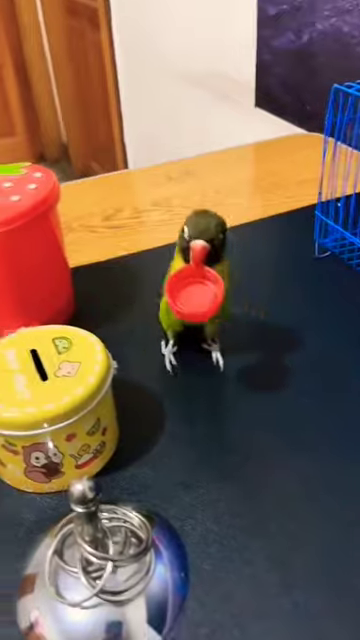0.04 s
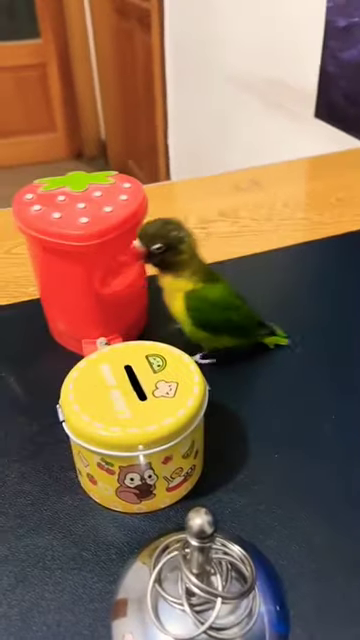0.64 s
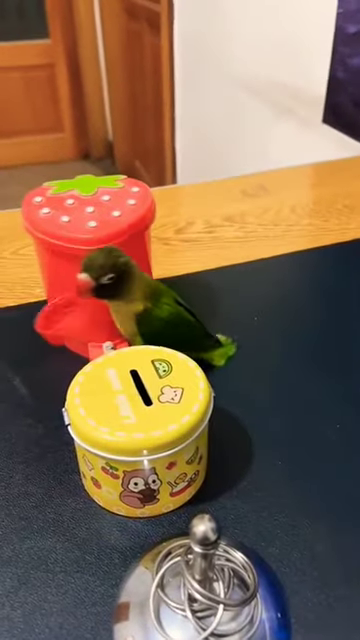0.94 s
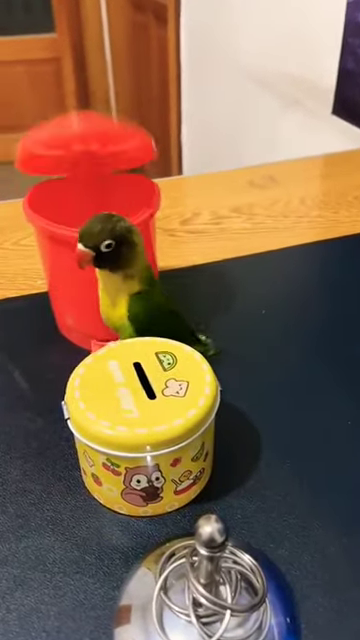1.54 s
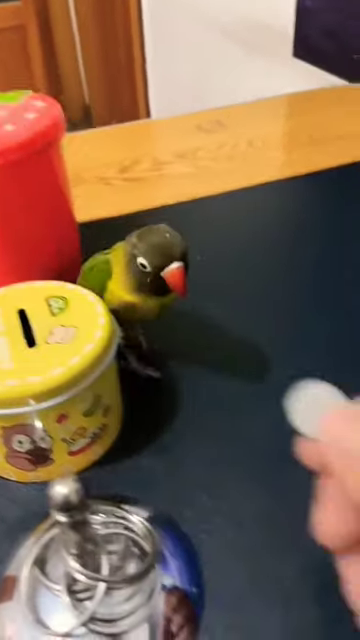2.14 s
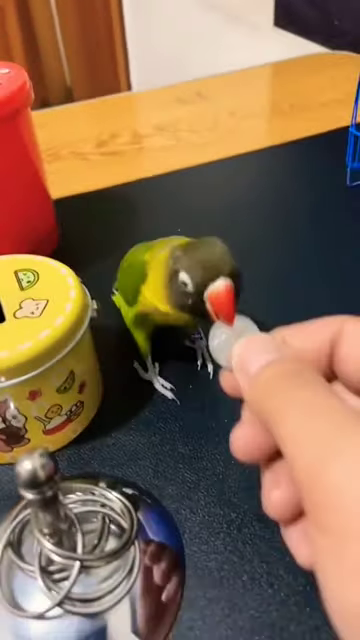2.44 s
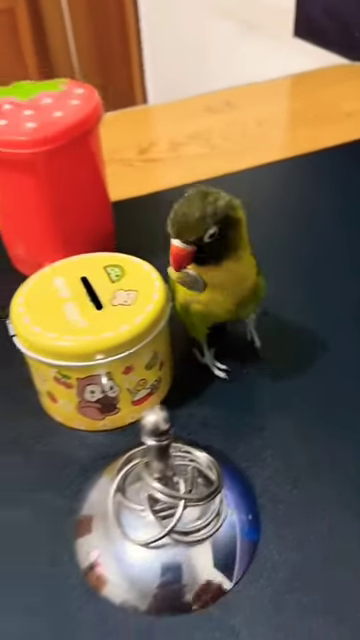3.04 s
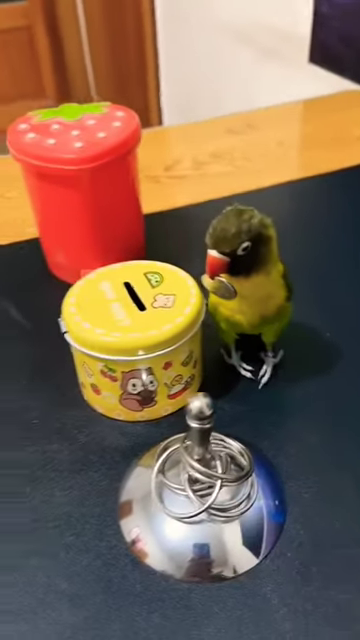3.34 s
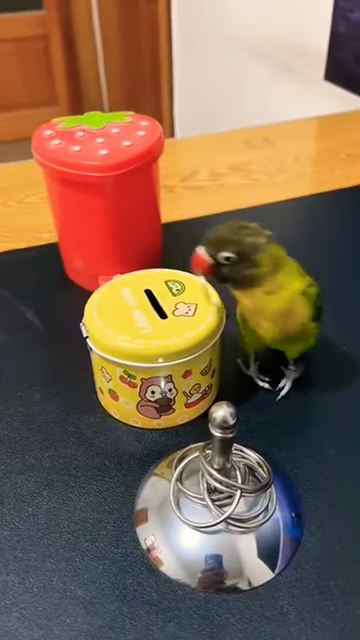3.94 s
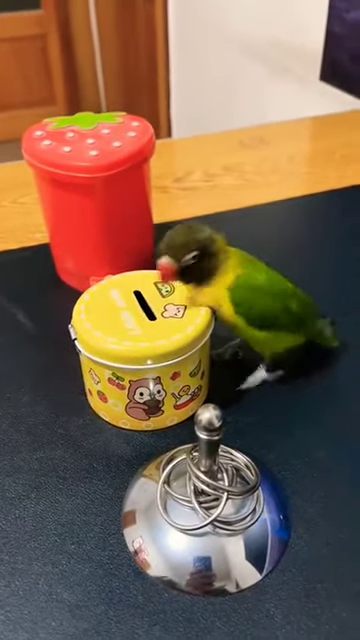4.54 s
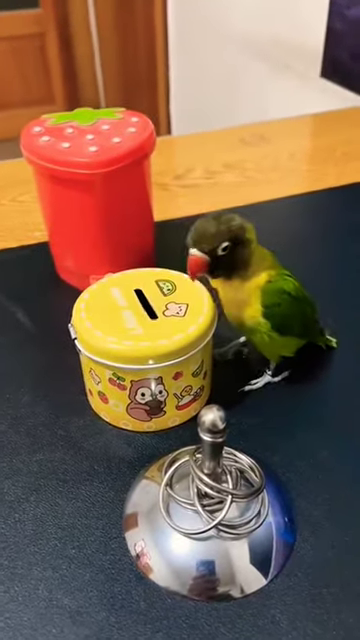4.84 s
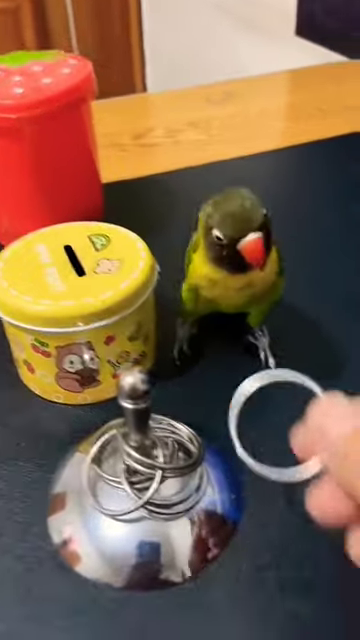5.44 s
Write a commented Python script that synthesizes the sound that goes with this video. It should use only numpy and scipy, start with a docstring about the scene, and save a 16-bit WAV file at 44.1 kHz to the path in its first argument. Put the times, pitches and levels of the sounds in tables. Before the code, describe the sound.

Light claw taps, a clattering plastic lid, one sharp knock, then a coin banging and bouncing in a tin money box indoors.

```python
"""A parrot's table tricks

In a bare, echoing room, a small parrot's claws tick as it carries a cap to a plastic pedal bin, whose
lid opens and clatters. Something hard knocks on the tabletop. The bird bangs a coin on a tin money box
and drops it through the slot, where it bounces. Each hit rings a thing's own tones (its modes) and adds
a brief crack. Rustling feathers and rubbing parts are noise that swells and fades."""
import sys
import numpy as np
from scipy import signal
from scipy.fft import rfft, irfft
from scipy.io import wavfile

SR = 44100
rng = np.random.default_rng(int(sys.argv[2]) if len(sys.argv) > 2 else 0)


def inscribe(sig):
    """Save sig as 16-bit PCM at rate SR to the path in sys.argv[1].

    A 1-D sig is mono; a 2-D sig holds one channel per row.
    Samples are clipped to [-1, 1] before scaling.
    """
    pcm = np.round(np.clip(np.atleast_2d(sig).T, -1, 1) * 32767)
    wavfile.write(sys.argv[1], SR, pcm.astype(np.int16))


N = 250488
TIME = np.arange(N) / SR

# Levels are relative. A fade time (t60) is how long a sound takes to drop by 60 dB.
# hits on the bin, tin and tabletop; weight boosts the lows, edge the highs, focus one narrow band:
# (time [s], level [dB], weight [dB], edge [dB], contact time [s], focus [Hz])
BIN_HITS = [(.8222, -37, -5, -3.5, 0.00024, 2450), (1.3009, -53, 0, -6, 0.00072, 2600),
            (1.3483, -51, 0.5, -4, 0.0039, 2200), (1.4340, -26, -4, -12, 0.00012, 1900),
            (1.4362, -25.5, 8.5, -12, 0.00027, 780), (1.453, -33, 3, -9.5, 0.0018, 800),
            (1.5475, -38, 10, -7.5, .0005, 780), (1.6042, -17, 2.5, -1.5, 0.00089, 2650),
            (1.6704, -18.5, -16, 0.5, .0001, 2400), (1.6745, -15.5, -10, -0.5, 0.00036, 4300),
            (1.6776, -17, -4.5, 0, .0004, 2900), (1.70, -27.5, -4, 3.5, 0.0037, 4800),
            (1.7255, -23.5, -27.5, 0.5, 0.002, 3000), (1.7538, -21, -5, -4.5, 0.00047, 2650),
            (1.789, -27.5, -7.5, -10, 0.00097, 2700), (2.0567, -45, -2.5, -5, 0.0025, 2286)]
COIN_HITS = [(4.2968, -19, 3, -4, 0.0013, 638), (4.3048, -22.5, 5.5, -0.5, 0.00026, 2500),
             (4.310, -33.5, -6.5, 2, 0.00095, 2660), (4.324, -27.5, 8.5, -2, 0.00035, 600),
             (4.6048, -31, 8, -2.5, 0.0005, 613), (4.617, -33.5, 8.5, -6.5, 0.0027, 3020),
             (4.638, -32, -7.5, 13, 0.002, 4150), (4.6412, -20, 3, 0, 0.00064, 1500),
             (4.6435, -23.5, -1.5, 4, 0.00061, 2080), (4.7407, -21, 0, 2, 0.0002, 3300),
             (4.7755, -31, -14.5, 0, 0.00042, 3160), (4.779, -19.5, -8.5, 0, 0.0011, 585),
             (4.793, -31, 6.5, -2, 0.0029, 3730), (4.886, -29, -5, -2, 0.004, 3000),
             (4.9062, -19, -3, 1.5, 0.0024, 573), (4.944, -28, 0.5, 3.5, 0.0033, 2970)]
TABLE_HITS = [(.823, -47, 4, -6, 0.00032, 805.5), (.910, -53.5, 8.5, -6, .0003, 770),
              (1.0807, -39.5, 3.5, -11, 0.0012, 560.6), (1.1034, -45, 6, -10.5, 0.0004, 250),
              (2.3459, -14.5, 5, 0, 0.000074, 2660)]
# light taps of claws and beak: (time [s], level [dB], edge [dB], contact time [s])
CLAW_TAPS = [(.051, -49, -4, 0.00091), (0.0774, -45.5, 7.5, 0.0011), (.139, -56, 9, .001),
             (.211, -50.5, 7, 0.00034), (.310, -53, -0.5, .0005), (.474, -50.5, 13, .0008),
             (.481, -46.5, 4, .0006), (.53, -48, 3, 0.0077), (.615, -48.5, -1, 0.003),
             (.693, -59.5, 7, .002), (.775, -53.5, 7, 0.0094), (.8016, -50.5, 8.5, .0004),
             (0.9415, -41.5, -1, 0.00092), (1.1857, -48, 4, .0016), (2.1725, -40.5, 5.5, 0.00027),
             (2.636, -43, 4, .001), (2.799, -52.5, 8, .001), (2.823, -53, 5, .0006),
             (2.854, -47.5, 2.5, 0.0011), (2.862, -45, -1.5, .002), (2.892, -50.5, 0, .002),
             (2.9227, -51, -7, .0006), (3.112, -43, -22, 0.014), (3.191, -52, 1, 0.0019),
             (3.237, -53.5, -10, 0.00078), (3.4313, -56.5, 0, .0004), (3.499, -56, 1.5, .0003),
             (4.187, -56.5, 4, 0.0019), (4.2268, -51, 1, 0.0021), (4.262, -49, 5, 0.0038),
             (4.288, -33.5, -6, 0.0048), (5.32, -40, -10.5, 0.0067), (5.458, -48.5, -3.5, .002),
             (5.4987, -51.5, 10, 0.0022)]
# dull thumps through the table as the bird steps back: (time [s], level [dB])
STEPS = [(4.645, -34.5), (4.749, -26.5), (4.793, -37), (4.907, -34), (4.955, -33), (5.262, -43.5)]

# the tones each thing rings with: (pitch [Hz], energy [dB], fade time [s])
BIN_MODES = [(314, -31.5, .12), (758, -7, 0.06), (846, -10, 0.045), (1357, -13.5, 0.031),
             (2000, -18.5, 0.022), (2300, -9, 0.02), (2673, -9.5, 0.046), (3190, -14, 0.019),
             (4025, -11.5, 0.0071), (4500, -24.5, .02), (5480, -20, 0.036)]
TIN_MODES = [(311, -29, .2), (567, -7.5, 0.033), (676, -11.5, 0.033), (781, -8, 0.071), (929, -12.5, 0.02),
             (1507, -15.5, 0.029), (1624, -18.5, 0.11), (2145, -9.5, 0.031), (2526, -12.5, 0.038),
             (3040, -14.5, 0.045), (3280, -12, 0.16), (4230, -18.5, 0.071), (5180, -24, 0.066),
             (5490, -21.5, 0.076), (9260, -33, 0.069), (9280, -33.5, 0.037)]
TABLE_MODES = [(206, -21, 0.042), (360, -8, 0.027), (502.5, -20, 0.023), (780, -12.5, 0.0075),
               (965, -14, 0.032), (1360, -12.5, 0.0027), (2560, -5.5, 0.0078), (3430, -15, 0.016),
               (4020, -17, 0.011)]
THUMP_MODES = [(83.5, -7, 0.26), (111.2, -7, 0.43), (150, -11.5, 0.054)]  # the whole table under a step
ROOM_BOOM_MODES = [(172.6, -18, 1.3), (242, -7, 0.13), (280, -13, 0.2087), (327, -6.5, 0.71),
                   (387.4, -2, 0.46), (368, -11, 1.2), (488, -15.5, 0.98), (790, -14, 0.9)]  # the room's low resonances, booming on after a knock
CLAW_MODES = [(2470, -15.5, .012), (3600, -17, 0.0064), (5130, -17, .008)]
# each thing's crack, a crowd of short-lived modes: (frequency [Hz], level [dB])
BIN_CRACK = [(150, -23.5), (500, -15), (900, -2), (1700, -5), (2600, -0.5), (4500, -7.5), (5700, -10),
             (6800, -21), (9000, -25), (11500, -47), (15000, -41.5)]
TIN_CRACK = [(40, -33), (200, -12), (350, -17.5), (700, 2), (1150, -6), (1600, -1), (3000, 1.5), (4500, -5),
             (7000, -14.5), (9200, -12.5), (11500, -26.5), (14000, -15.5), (16000, -31.5)]
TABLE_CRACK = [(35, -19), (100, -10.5), (200, 2.5), (330, 0), (450, 1.5), (600, -0.5), (900, 1), (1300, -1),
               (1900, -0.5), (2700, 0), (4200, -6), (6500, -13.5), (9500, -18.5), (11500, -27),
               (15000, -22)]
CLAW_CRACK = [(60, -22), (200, -11), (700, -7.5), (1500, -5.5), (2600, 4.5), (5000, -5), (7000, -8.5),
              (9000, -10), (11500, -23.5), (15000, -17.5)]  # also shapes the feather noise

# rubbing movements: (start [s], length [s], level [dB])
PEDAL_PUSHES = [(1.348, .014, -51), (1.42, 0.094, -44), (1.575, .03, -44.5), (1.875, 0.022, -41.5),
                (2.045, 0.025, -45.5), (2.21, 0.015, -47), (2.324, 0.014, -45)]
FEATHER_RUSTLES = [(0, 0.092, -58), (.93, 0.088, -61.5), (1.18, 0.57, -64.5), (2.08, 0.16, -64.5),
                   (2.77, .1, -61), (3.04, 0.16, -65.5), (4.17, 0.11, -64.5), (5.28, .22, -68)]
BEAK_SLIDES = [(1.2, 0.047, -71), (3.01, 0.12, -62.5), (3.195, 0.033, -70)]
# the tone colour of each noise: (frequency [Hz], level [dB])
BIN_HOLLOW_COLOUR = [(60, -25.5), (160, -16), (330, -17), (520, -20.5), (680, -6.5), (780, -2), (880, -8.5),
                     (1100, -25), (2400, -23.5), (5000, -48), (12000, -80.5)]
SLIDE_COLOUR = [(1000, -20.5), (5000, -7), (11000, -9.5), (13500, 2), (16000, -5)]
ECHO_COLOUR = [(80, -8.5), (220, 6), (350, 4.5), (500, -4.5), (900, -3.5), (1500, -1.5), (2600, -9),
               (5000, -5), (9000, -5.5), (14000, -3.5)]
STILL_ROOM_COLOUR = [(15, -57.5), (25, -25.5), (43, -8), (102, -9), (134, -15.5), (249, -18.5), (285, -22),
                     (439, -23.5), (734, -26.5), (1040, -28), (1480, -31), (1610, -27.5), (12200, -46),
                     (16000, -45.5)]
# how long the room echoes: (frequency [Hz], fade time [s])
ECHO_FADES = [(100, 0.47), (350, 0.79), (1000, 0.86), (2500, 0.86), (5000, 0.85), (9000, 0.68),
              (15000, 0.33)]


def pedal_bin():
    """The plastic bin and lid clatter; pushing the pedal rubs its linkage, sounding the bin's hollow."""
    clatter = struck(BIN_HITS, BIN_MODES, BIN_CRACK, crack_db=-1.5, crack_t60=0.015, vary_db=1)
    rubbing = strokes(PEDAL_PUSHES, attack_s=0.01, t60=0.081) * noise(BIN_HOLLOW_COLOUR)
    return clatter + from_db(-5.5) * rubbing


def coin_on_tin():
    """The tin box rings as the coin bangs on it, then bounces inside."""
    return struck(COIN_HITS, TIN_MODES, TIN_CRACK, crack_db=0.5, crack_t60=0.042, vary_db=2)


def table_knocks():
    """Something hard hits the tabletop, which rings briefly."""
    return struck(TABLE_HITS, TABLE_MODES, TABLE_CRACK, crack_db=0, crack_t60=0.019, vary_db=2)


def thumps_and_booms():
    """Steps thump the table; hard knocks set the room booming."""
    out = np.zeros(N)
    for start_s, db in STEPS:
        thump = ringing(THUMP_MODES, TIME[:SR // 2], rise_s=0.006, vary_db=2)
        add(out, start_s, from_db(db) * thump)
    for start_s, db, weight_db, *_ in TABLE_HITS:
        boom = ringing(ROOM_BOOM_MODES, TIME[:2 * SR], rise_s=0.0058, vary_db=2)
        add(out, start_s, from_db(db + weight_db / 2 - 1.5) * boom)
    return out


def claw_ticks(weight_db=3, focus_hz=4500):
    """Claws and beak touch lightly, making small, bright ticks."""
    hits = [(start_s, db, weight_db, edge_db, contact_s, focus_hz)
            for start_s, db, edge_db, contact_s in CLAW_TAPS]
    return from_db(-4.5) * struck(hits, CLAW_MODES, CLAW_CRACK, crack_db=0, crack_t60=0.018, vary_db=0)


def rustles():
    """Feathers brush unevenly as the bird moves; the cap or coin hisses as it slides in the beak."""
    flicker_db = 1.5 * noise([(20, 3.5), (120, 0), (500, -52)])
    feathers = strokes(FEATHER_RUSTLES, attack_s=0.024, t60=0.9) * noise(CLAW_CRACK)
    slides = strokes(BEAK_SLIDES, attack_s=0.03, t60=0.2) * noise(SLIDE_COLOUR)
    return from_db(flicker_db) * (feathers + slides)


def room_echo(gap_s=0.0069, build_s=0.0031):
    """The room's answer to a click: a short gap, then dense reflections that fade band by band."""
    t, hz = TIME[:SR], np.fft.rfftfreq(SR, 1 / SR)
    white, out = rfft(rng.standard_normal(SR)), np.zeros(SR)
    centres_hz = np.geomspace(60, 16000, 17)
    swell = 1 - np.exp(-np.maximum(t - gap_s, 0) / build_s)
    for centre_hz, share in zip(centres_hz, np.eye(len(centres_hz))):
        band = at_hz(np.c_[centres_hz, share], hz) * from_db(at_hz(ECHO_COLOUR, hz))
        envelope = swell * fade(t, at_hz(ECHO_FADES, centre_hz))
        out += irfft(white * band, SR) * envelope / np.linalg.norm(envelope)
    return out


def background(air_db=-63, hum_db=-68.5, hum_hz=101.7):
    """Low room rumble, faint hiss and a mains hum."""
    hum = np.sqrt(2) * np.sin(2 * np.pi * hum_hz * TIME)
    return from_db(air_db) * noise(STILL_ROOM_COLOUR) + from_db(hum_db) * hum


def struck(hits, modes, crack_spectrum, crack_db, crack_t60, vary_db):
    """Each hit rings a thing's main modes and sets off a brief crack of many more."""
    out, t = np.zeros(N), TIME[:2 ** 13]
    for start_s, db, weight_db, edge_db, contact_s, focus_hz in hits:
        colour = hit_colour(weight_db, edge_db, focus_hz)
        ring = ringing(modes, t, contact_s, vary_db, colour)
        snap = from_db(crack_db) * crack(crack_spectrum, t, contact_s, crack_t60, colour)
        add(out, start_s, from_db(db) * (ring + snap))
    return out


def hit_colour(weight_db, edge_db, focus_hz, focus_db=8, width_octaves=0.25):
    """The touch sets the lows and highs; the modes that move most at the struck spot get a boost."""
    tilt = [(300, weight_db / 2), (800, weight_db), (2000, 0.002), (3000, 0), (7000, edge_db)]

    def gain(hz):
        octaves_away = np.log2((hz + 1) / focus_hz)
        boost_db = focus_db * np.exp(-(octaves_away / width_octaves) ** 2 / 2)
        return from_db(at_hz(tilt, hz) + boost_db)
    return gain


def ringing(modes, t, rise_s, vary_db, colour=lambda hz: 1):
    """Modes swell during the contact, then fade; vary_db lets their strength differ from hit to hit."""
    out = np.zeros(len(t))
    for k, (hz, db, t60) in enumerate(modes):
        wave = np.sin(2 * np.pi * hz * t) * fade(t, t60) * (1 - np.exp(-t / rise_s))
        wave *= np.sqrt(SR / 1000 / np.sum(wave ** 2))  # the energy of 1 ms at full scale
        strength = colour(hz) * from_db(db + vary_db * rng.standard_normal())
        out += (-1) ** k * strength * wave
    return out


def crack(spectrum, t, contact_s, t60, colour):
    """A crowd of short-lived modes: random in timing, but shaped by the thing's own spectrum."""
    envelope = (1 - np.exp(-t / contact_s)) * fade(t, t60 + 5 * contact_s)
    burst = rfft(rng.standard_normal(len(t)) * envelope)
    shaped = burst / np.abs(burst) * spectrum_gains(spectrum, len(t))
    sound = irfft(shaped * colour(np.fft.rfftfreq(len(t), 1 / SR)))
    first_half = t < t[-1] / 2
    return np.sqrt(SR / 1000) * sound * first_half  # same energy scale as a mode


def strokes(moves, attack_s, t60):
    """Loudness of rubbing over time: each move swells, holds while it lasts and dies away."""
    gain = np.zeros(N)
    for start_s, length_s, db in moves:
        swell = np.clip((TIME - start_s) / attack_s, 0, 1)
        gain += from_db(db) * swell * fade(np.maximum(TIME - start_s - length_s, 0), t60)
    return gain


def noise(spectrum):
    """Noise with the given tone colour and an average power of 1."""
    return irfft(rfft(rng.standard_normal(N)) * spectrum_gains(spectrum, N), N)


def spectrum_gains(spectrum, size):
    """Turn a spectrum table into a gain for every frequency, with an average power of 1."""
    gains = from_db(at_hz(spectrum, np.fft.rfftfreq(size, 1 / SR)))
    return gains / np.sqrt(np.mean(gains ** 2))


def at_hz(points, hz):
    """Read between a table's rows, giving every octave equal room."""
    row_hz, values = np.transpose(points)
    return np.interp(np.log(np.maximum(hz, 1)), np.log(row_hz), values)


def fade(t, t60):
    """Die away by 60 dB every t60 seconds."""
    return np.exp(-np.log(1000) * t / t60)


def from_db(db):
    """Turn decibels into a gain."""
    return 10 ** (np.asarray(db) / 20)


def add(out, start_s, sound):
    """Mix a sound in at the given time."""
    start = round(start_s * SR)
    out[start:start + len(sound)] += sound[:N - start]


def scene():
    """Mix everything; the bin, tin, knocks and claws each send their own share into the echo."""
    plastic, tin, knocks, claws = pedal_bin(), coin_on_tin(), table_knocks(), claw_ticks()
    impacts = plastic + tin + knocks + claws + thumps_and_booms()
    to_room = from_db(0.53) * plastic + from_db(-1) * tin + from_db(2.5) * knocks + from_db(-0.5) * claws
    echo = signal.fftconvolve(to_room, room_echo())[:N]
    return (from_db(7.5) * (impacts + echo) + rustles() + background())[None]


def record(dry, ceiling=1.3, cutoff_hz=15800):
    """Round off the loudest peaks and cut the very highest treble."""
    rounded = ceiling * np.tanh(dry / ceiling)
    return signal.sosfilt(signal.ellip(10, 0.2, 80, cutoff_hz, fs=SR, output="sos"), rounded)


dry = scene()
out = record(dry)
inscribe(out)
```